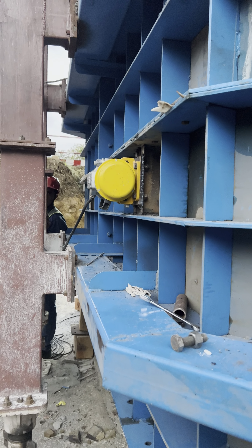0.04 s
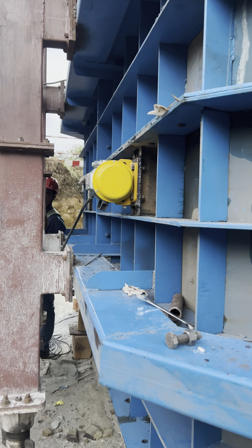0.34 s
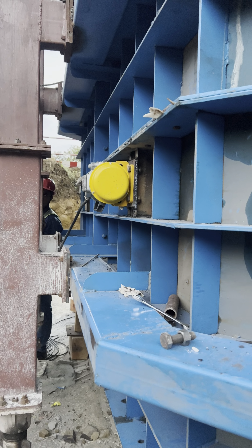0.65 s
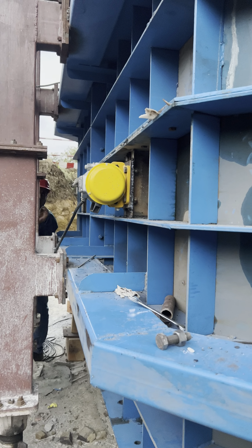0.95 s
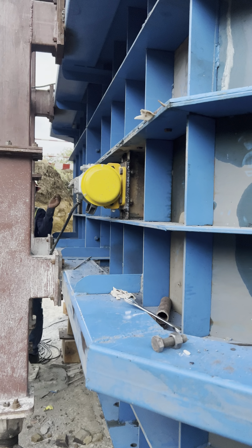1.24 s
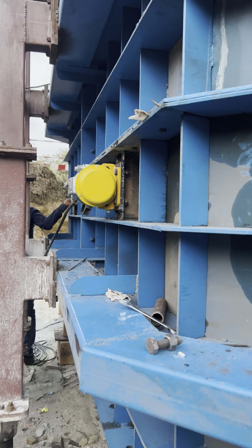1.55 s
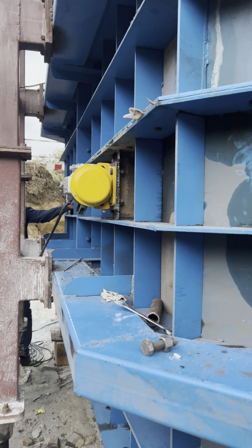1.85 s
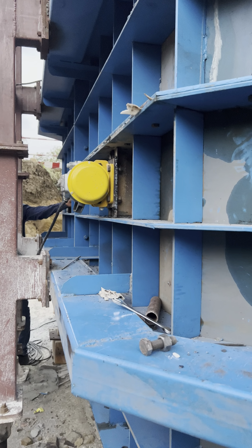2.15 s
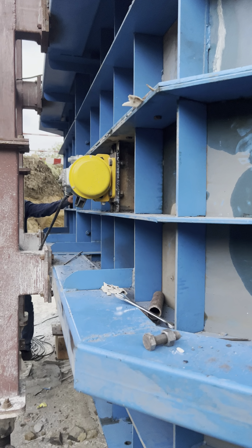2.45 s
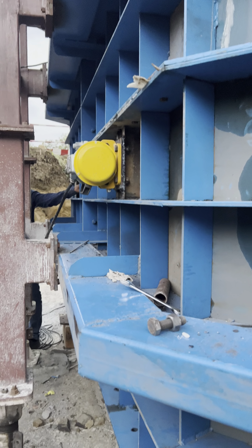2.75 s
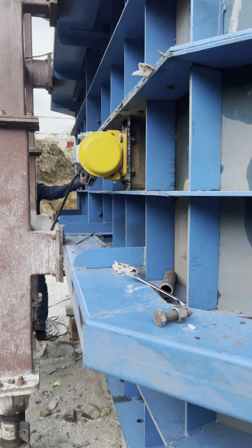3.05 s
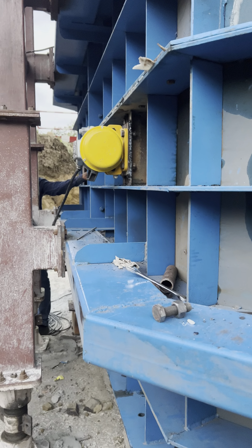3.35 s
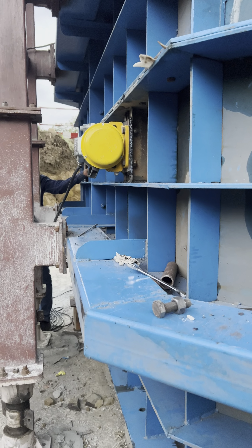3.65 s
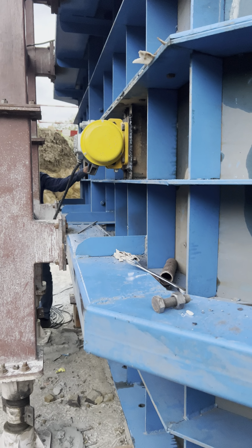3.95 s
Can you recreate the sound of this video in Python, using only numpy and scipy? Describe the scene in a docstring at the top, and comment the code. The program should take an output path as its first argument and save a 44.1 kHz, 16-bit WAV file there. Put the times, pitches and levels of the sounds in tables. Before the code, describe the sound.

An electric vibrator drones deeply and steadily against rattling, buzzing steel formwork.

```python
"""Vibrator on steel formwork

An electric vibrator bolted to the form creeps up from 73 to 77 turns a second. Its off-centre weight
drives a deep drone; the plates rattle and buzz in step with it, and the bearings whine faintly.
Other site machinery hums behind, and there are a few light scrapes."""
import sys
import numpy as np
from scipy import signal
from scipy.fft import rfft, irfft
from scipy.io import wavfile
from scipy.ndimage import uniform_filter1d

SR = 44100
rng = np.random.default_rng(int(sys.argv[2]) if len(sys.argv) > 2 else 0)


def to_wav(s):
    """Save 16-bit WAV."""
    ch = np.atleast_2d(s).T  # columns
    pcm = np.round(np.clip(ch, -1, 1) * 32767)  # PCM
    wavfile.write(sys.argv[1], SR, pcm.astype(np.int16))


N = 176400
TIME = np.arange(N) / SR

# Likeness of left and right: frequency_hz, correlation
COHERENCE = [(30, 0.62), (70, 0.91), (120, 1), (200, 1), (330, 0.93), (430, 0.82), (550, -0.061),
             (750, 0.052), (1100, 0.34), (1600, 0.71), (2300, 0.46), (3300, -0.4), (4500, -0.012),
             (6000, 0.91), (8000, 0.69), (11000, -0.58)]
# Stereo balance: frequency_hz, left_minus_right_db
STEREO_BALANCE = [(150, 2), (280, 0), (400, 0.5), (550, -0.5), (750, 2), (1200, 1.2), (2200, 0.8),
                  (4000, 0.3), (8000, 0)]


def drone(angle):
    """Rotating unbalance: the off-centre weight forces the form at harmonics of the shaft speed."""
    # Harmonics 1 to 6: time_s, then level_db of each
    harmonic_levels = [(0, -12, -23, -27, -42, -25.5, -26.5),
                       (0.3, -12.1, -21.2, -26.7, -42.7, -26.6, -26.0),
                       (0.6, -12.4, -22.9, -30.2, -36.4, -26.9, -26.0),
                       (0.95, -12.9, -24.2, -25.3, -35.3, -28.3, -32.2),
                       (1.2, -12.9, -23.3, -27.7, -34.1, -29.8, -28.3),
                       (1.5, -13.7, -25.5, -33.7, -37.0, -26.8, -31.8),
                       (1.8, -15.8, -23.3, -27.5, -29.9, -40.6, -38.8),
                       (2.05, -16.8, -19.9, -32.8, -20.6, -33.0, -50.0),
                       (2.3, -16.2, -17.8, -23.9, -21.8, -32.5, -29.1),
                       (2.6, -16.5, -18.6, -22.4, -22.4, -27.2, -32.5),
                       (2.88, -17.4, -17.3, -25.7, -22.1, -33.2, -27.1),
                       (3.1, -14.6, -20.6, -40.0, -26.7, -24.6, -34.1),
                       (3.35, -13.8, -21.0, -40.7, -28.4, -39.6, -32.5),
                       (3.55, -14.4, -20.9, -30.6, -26.5, -26.3, -47.2),
                       (3.8, -15.3, -20.1, -33.8, -22.8, -24.9, -29.0),
                       (4, -15.6, -22.4, -36.9, -21.9, -26.0, -26.0)]
    out = np.zeros((2, N))
    for k, db in enumerate(curve(harmonic_levels), 1):
        tone = amp(db) * np.exp(1j * (k * angle + 2 * np.pi * rng.random()))
        mid = 1 + .1 * (k / 6) * waver(7)
        side = .22 * (k / 6) ** 4 * waver(1.5)
        out += (tone * np.array([mid + side, mid - side])).real
    return np.sqrt(2) * out


def loose_contacts(size=2048):
    """Superposition: countless small impacts merge into noise, uneven in time and frequency."""
    # Band centres: frequency_hz
    bands = [380, 600, 1200, 2800, 6500]
    # Strength of the contacts: time_s, then gain_db of each band
    band_gains = [(0, -2, -6.5, 1, 1.3, 0.84), (.25, -2.5, -2.5, 0, 1.7, 0.25),
                  (.6, -1, -3, 0.5, -0.81, -1.7), (1.1, 1, -0.5, 0.5, -4, -1),
                  (1.5, -1, -2.5, 1.5, -0.52, -1.2), (1.9, 2.5, -2, -1.5, -2.1, -2),
                  (2.1, -4.5, -1.5, -0.5, -2.1, -0.83), (2.25, -5.5, -2.5, -2.5, 2.4, -1),
                  (2.75, -4.5, -2.5, -3.5, -0.088, 0.81), (3.05, 2.5, 0, 1, 0.5, -1),
                  (3.35, 1.5, 3.5, 2, -1.8, -1.5), (3.6, -0.5, 1.5, 4, -0.7, -1.9),
                  (3.85, -0.5, 6, 3.5, 0.5, -3.5), (4, -2, 4, 1, -1.9, -1)]
    hop = size // 4
    hz = np.fft.rfftfreq(size, 1 / SR)
    times = np.arange(N // hop + 5) * hop / SR
    shape = (len(times), len(hz))
    left, independent = rng.standard_normal((2, *shape)) + 1j * rng.standard_normal((2, *shape))
    likeness = read(COHERENCE, hz)
    right = likeness * left + np.sqrt(1 - likeness ** 2) * independent
    patches = uniform_filter1d(rng.standard_normal(shape), size=9, axis=0)
    patches_db = 2.45 * unit_rms(uniform_filter1d(patches, size=4, axis=1))
    band_db = np.array([np.interp(np.log(hz + 1), np.log(bands), row)
                        for row in curve(band_gains, times).T])
    frames = np.array([left, right]) * amp(band_db + patches_db)
    return signal.istft(frames.swapaxes(1, 2), nperseg=size, noverlap=size - hop)[1][:, :N]


def plate_rattle(angle, level_db=-23, mode_spacing_hz=13):
    """Modal excitation: loose contacts drive the steel's close-set modes, hardest once each turn."""
    # Spectral envelope of the plates: frequency_hz, gain_db
    response = [(20, -28), (42, -22.5), (85, -13.5), (105, -8.5), (135, -4.5), (165, -6.5), (195, -2.5),
                (260, -7.5), (340, -2), (395, 2.5), (425, 3), (485, -2), (540, -1), (567, -9.5), (595, 0),
                (640, -12), (700, -4), (820, -10), (920, -11), (1130, -15.5), (1400, -15), (1750, -22),
                (2500, -23), (3100, -26.5), (3900, -31.5), (5000, -41.5), (6500, -43.5), (7400, -39.5),
                (8600, -46.5), (9500, -46.5), (10400, -49.5), (11500, -48.5)]
    hz = np.fft.rfftfreq(N, 1 / SR)
    contacts = loose_contacts()
    surge = unit_rms((1 + .14 * np.cos(angle)) * amp(.7 * drift(35)))
    steady = np.clip(.54 * hz / 6500, 0, 1)  # the higher the hiss, the less it surges
    drive = rfft(contacts * surge) * (1 - steady) + rfft(contacts) * steady
    mode_hz = np.arange(0, SR / 2, mode_spacing_hz)
    modes = np.array([np.interp(hz, mode_hz, row) for row in rng.standard_normal((2, len(mode_hz)))])
    ripple_db = 1.8 * modes * np.clip(hz / 400 - 1, 0, 1)
    steel = amp(read(response, hz) + ripple_db) * pan(hz)
    return amp(level_db) * unit_rms(irfft(drive * steel, N))


def plate_buzz(angle, shaft_hz, wander_db=5):
    """Periodic impact: plates knocking once a turn give a comb of harmonics, each wandering in level."""
    # Envelope of the comb: frequency_hz, level_db
    comb = [(520, -42), (700, -43), (1000, -51), (1500, -51.5), (2200, -58), (3000, -66), (4000, -68),
            (4800, -75.5)]
    # Strength of the knocking: time_s, gain_db
    knocking = [(0, 2.5), (1.3, -3), (2.05, -3), (2.3, 2.5), (2.8, 2), (3.05, -2.5), (4, -1.5)]
    out = np.zeros((2, N))
    for k in range(6, 62):
        hz = k * shaft_hz
        strength = amp(read(comb, hz)) * unit_rms(amp(wander_db * drift(1.23)))
        phase = k * angle + .99 * drift(7) + 2 * np.pi * rng.random()
        out += (spread(hz) * strength * np.exp(1j * phase)).real
    return np.sqrt(2) * out * amp(curve(knocking))


def whines(angle, shaft_hz):
    """Forced vibration: bearings and plates sound thin, swelling tones that track the shaft speed."""
    # Tones: shaft_multiple, level_db, peak_s, half_length_s
    tones = [(7.98, -37.5, .4, .6), (9.98, -33.5, 2.55, .5), (9.98, -39, 3.9, .4), (13, -46, 2.5, .5),
             (17, -46, 3, .9), (19.94, -39.5, 2.6, .38), (33.88, -41, 2.66, .22), (35.9, -42, 2.6, .25),
             (38.9, -61, .6, .9), (40.83, -55, 2.55, .4), (48.63, -57, 1.45, .3), (49.83, -56, 2.6, .4),
             (52.38, -62, 2.1, 2), (54.85, -62, 2.55, .4), (70.6, -68, 1.05, .7), (97.3, -69, 1.7, 1.3),
             (97.35, -58.5, 3.33, .25), (97.7, -69, 3.9, .2), (99.36, -67, 2.6, .6), (101.4, -71, 2.8, 1),
             (109.4, -69, .9, .9), (116, -77, 3, 1), (150.05, -77, 1.8, 2), (152.1, -74, .95, .55)]
    out = np.zeros((2, N))
    for multiple, db, peak_s, half_length_s in tones:
        swell = amp(db) / (1 + ((TIME - peak_s) / half_length_s) ** 4)
        tone = unit_rms(1 + .13 * waver(9.2)) * np.exp(1j * multiple * angle)
        out += (spread(multiple * shaft_hz) * swell * tone).real
    return np.sqrt(2) * out


def machinery_hum():
    """Narrow-band modulation: low tones of other machines waver in amplitude and phase."""
    # Machine tones: pitch_hz, level_db
    tones = [(44.5, -52), (103, -37), (111, -44), (120.5, -41.5)]
    # Strength of the hum: time_s, gain_db
    gains = [(0, 4.5), (1.5, 5.5), (1.9, 2.5), (2.15, -1), (4, -2.5)]
    out = np.zeros(N)
    for hz, db in tones:
        wobble = 1 + .3 * (drift(2.6) + 1j * drift(1.9))
        out += amp(db) * (wobble * np.exp(2j * np.pi * (hz * TIME + rng.random()))).real
    return np.sqrt(2) * out * amp(curve(gains))


def scrapes(log_width=.19):
    """Sliding friction: each light rub gives a short band of bright, gritty noise."""
    # Rubs: start_s, length_s, centre_hz, level_db
    rubs = [(.78, 0.046, 5500, -52), (2.2, .06, 6900, -61), (2.657, .07, 10000, -57.5)]
    out = np.zeros((2, N))
    hz = np.fft.rfftfreq(N, 1 / SR)
    for start_s, length_s, centre_hz, db in rubs:
        band = np.exp(-.5 * (np.log((hz + 1) / centre_hz) / log_width) ** 2)
        grit = rng.standard_normal((2, N)) * amp(4 * drift(90))
        stroke = np.sin(np.pi * np.clip((TIME - start_s) / length_s, 0, 1))
        out += amp(db) * stroke * unit_rms(irfft(rfft(grit) * band, N))
    return out


def amp(db):
    """Amplitude ratio of a level in decibels."""
    return 10 ** (np.asarray(db) / 20)


def unit_rms(x):
    """Normalisation to unit power."""
    return x / np.sqrt(np.mean(abs(x) ** 2) + 1e-20)


def read(points, hz):
    """Interpolation of a spectrum in log frequency."""
    frequencies, values = np.transpose(points)
    return np.interp(np.log(hz + 1), np.log(frequencies), values)


def curve(rows, t=TIME):
    """Linear interpolation of each column in time."""
    times, *columns = np.transpose(rows)
    return np.array([np.interp(t, times, column) for column in columns])


def drift(rate_hz, size=2048, control_hz=400):
    """Low-passed noise: a smooth fluctuation of rms about 1."""
    hz = np.fft.rfftfreq(size, 1 / control_hz)
    slow = irfft(rfft(rng.standard_normal(size)) / (1 + (hz / rate_hz) ** 4))
    return np.interp(TIME, np.arange(size) / control_hz, unit_rms(slow))


def waver(rate_hz):
    """Quadrature noise: complex drift that modulates amplitude and phase."""
    return drift(rate_hz) + 1j * drift(rate_hz)


def pan(hz):
    """Level difference, split between left and right."""
    return amp(read(STEREO_BALANCE, hz) * np.array([[.5], [-.5]]))


def spread(hz):
    """Phase difference: a panned tone reaches the two sides out of step where coherence is low."""
    phase_gap = np.arccos(np.clip(read(COHERENCE, hz), 0, 1))
    skew = np.tan(phase_gap / 2) * rng.choice([-1, 1])
    return np.array([[1 + 1j * skew], [1 - 1j * skew]]) * pan(hz)


def scene():
    """Common excitation: one shaft angle times drone, rattle, buzz and whines; hum and scrapes add on."""
    # Rotation of the vibrator: time_s, speed_hz
    shaft_speed = [(0, 73.01), (0.25, 73.01), (0.55, 73.32), (0.95, 73.4), (1.3, 73.8), (1.53, 73.88),
                   (1.72, 74.67), (1.85, 74.85), (2.08, 75.39), (2.3, 75.38), (2.65, 75.54), (2.9, 75.88),
                   (3.2, 76.65), (3.65, 76.69), (3.88, 77.03), (4, 77.05)]
    speed = curve(shaft_speed)[0]
    angle = 2 * np.pi * np.cumsum(speed) / SR
    tonal = drone(angle) + plate_buzz(angle, speed.mean()) + whines(angle, speed.mean())
    return tonal + plate_rattle(angle) + machinery_hum() + scrapes()


def record(dry, cutoff_hz=11750):
    """Band limiting: a steep low-pass filter removes the top treble."""
    lowpass = signal.firwin(511, cutoff_hz, window=("kaiser", 9), fs=SR)
    return signal.oaconvolve(dry, lowpass[None], "same")


dry = scene()
out = record(dry)
to_wav(out)
```